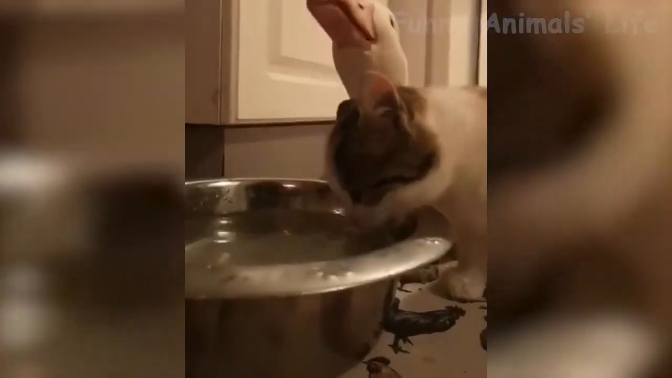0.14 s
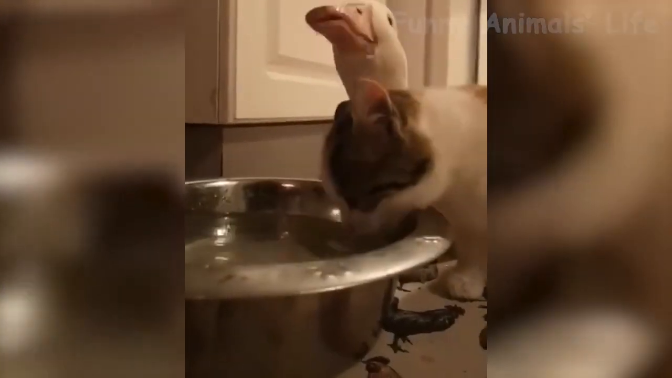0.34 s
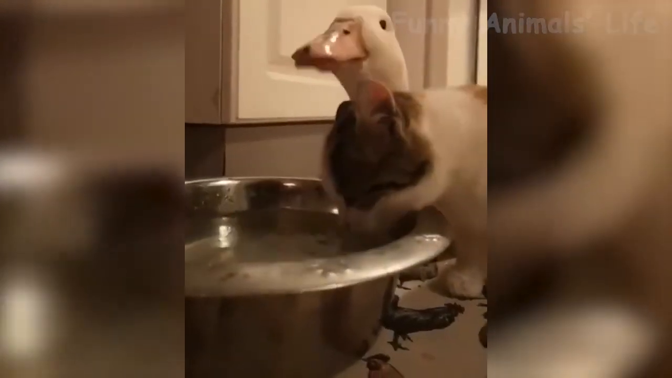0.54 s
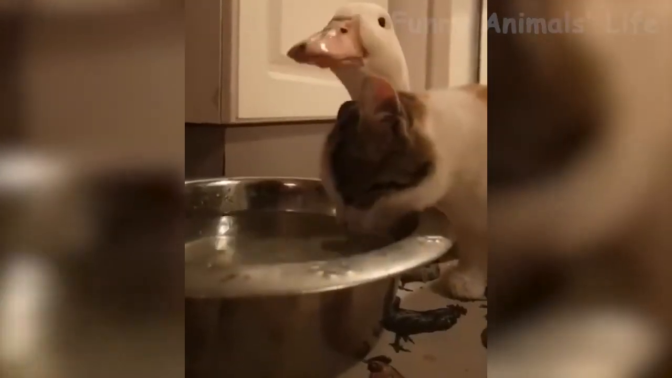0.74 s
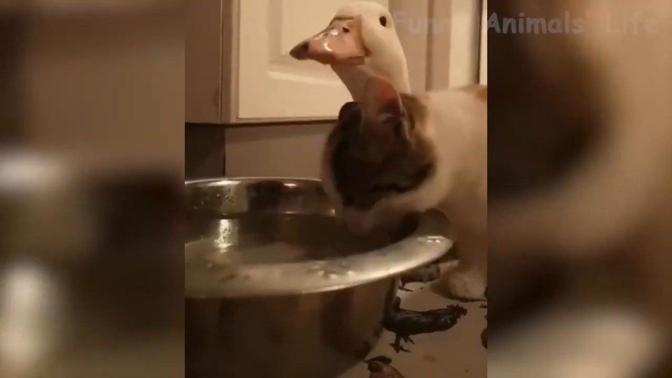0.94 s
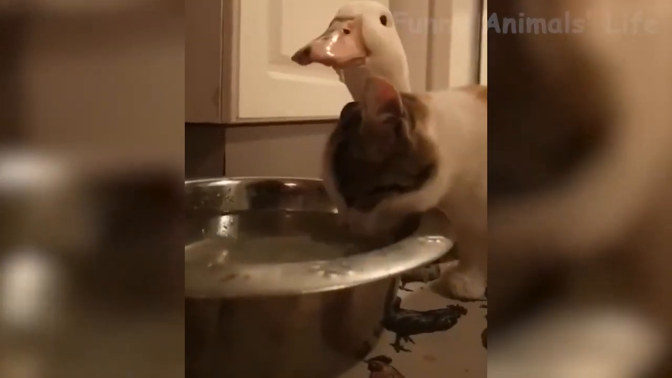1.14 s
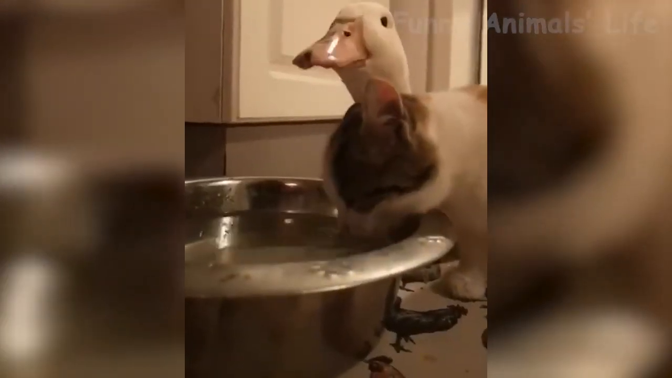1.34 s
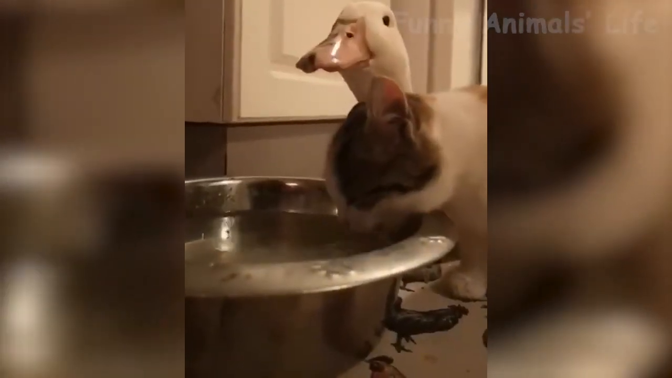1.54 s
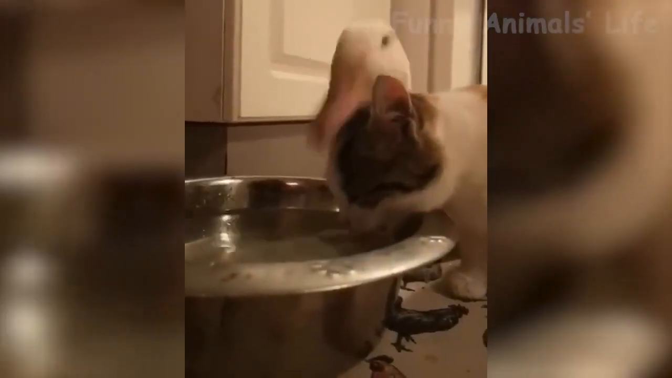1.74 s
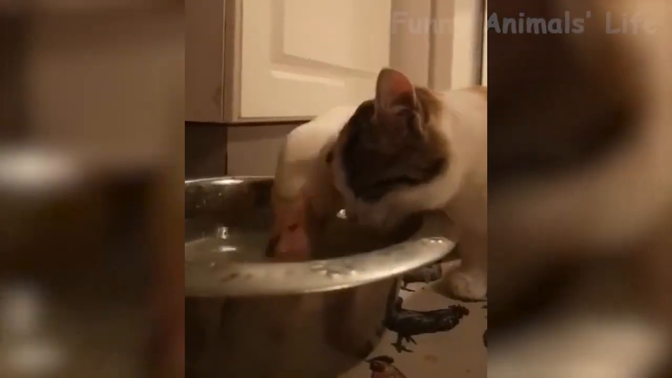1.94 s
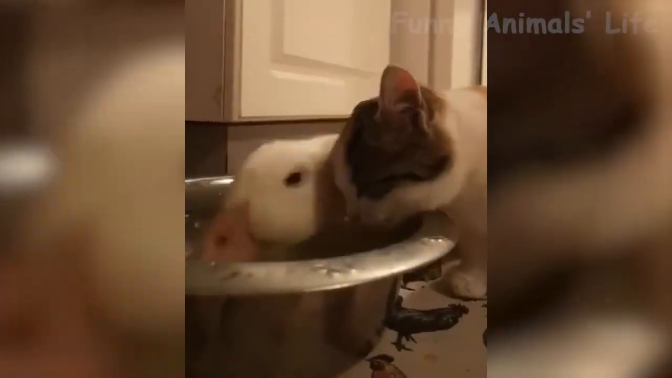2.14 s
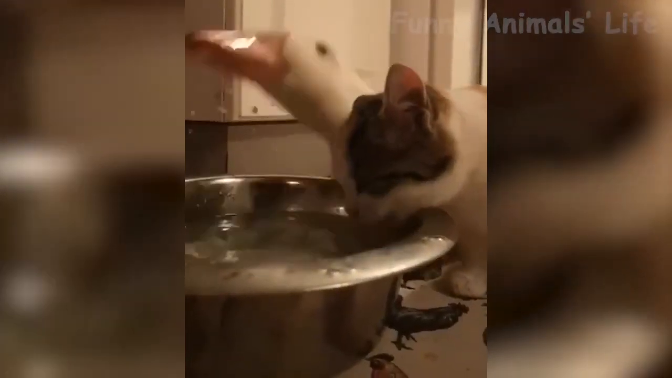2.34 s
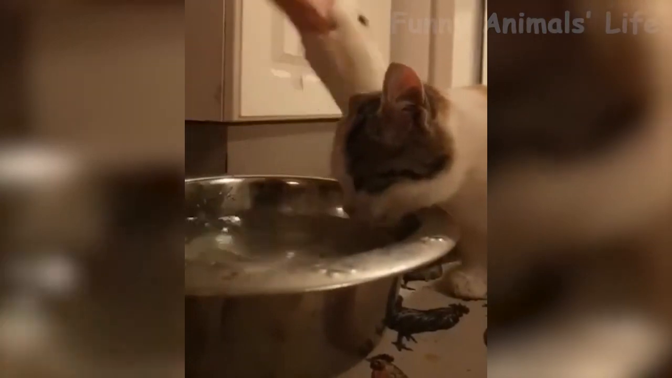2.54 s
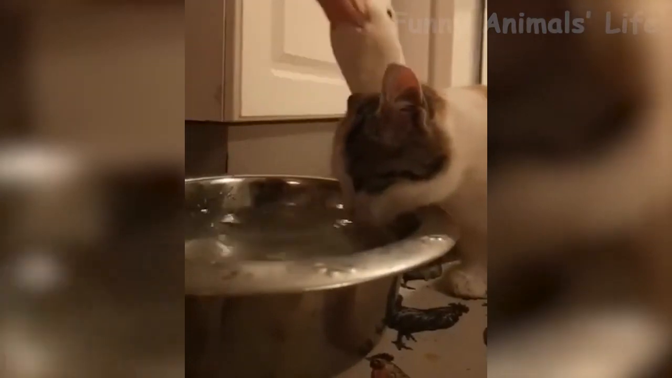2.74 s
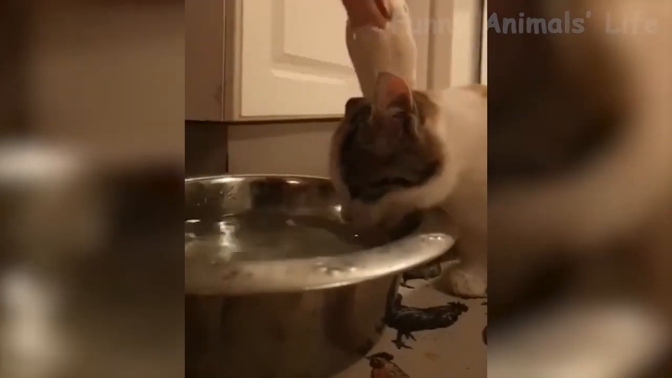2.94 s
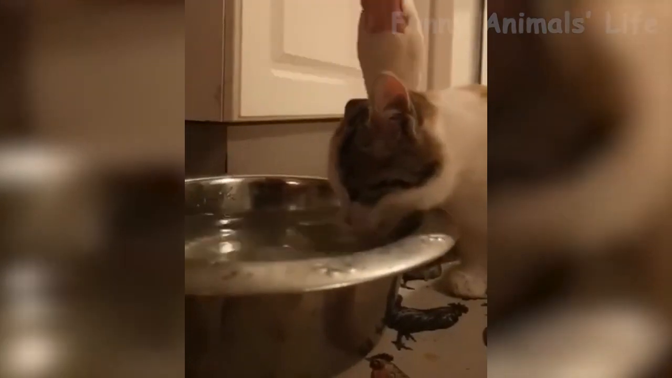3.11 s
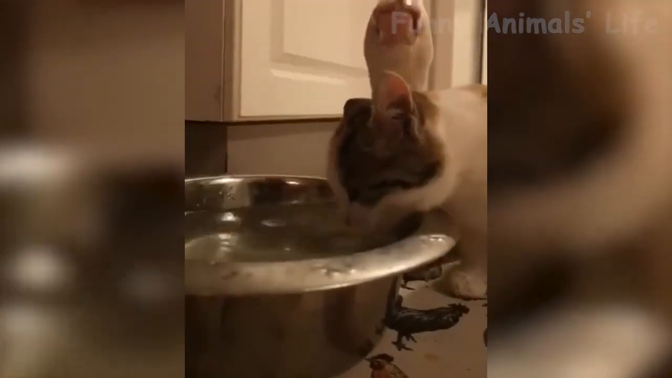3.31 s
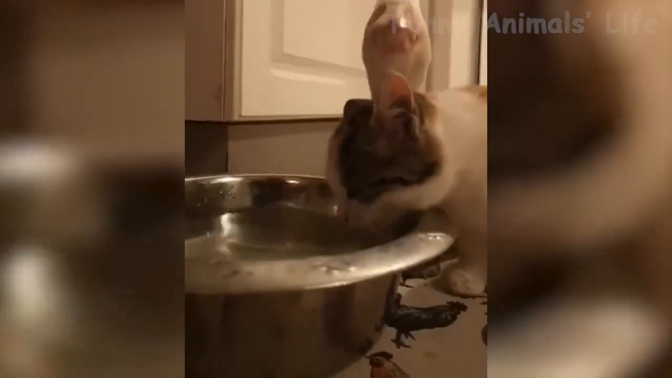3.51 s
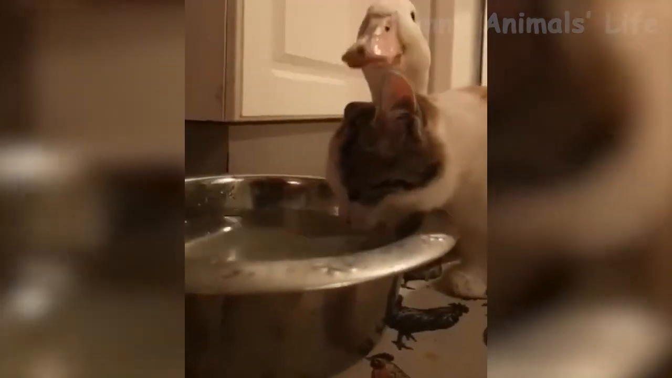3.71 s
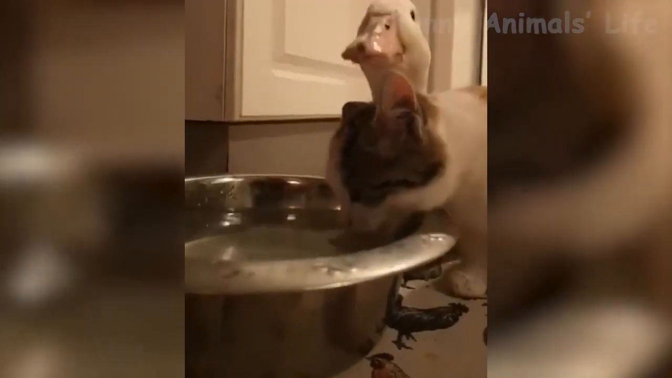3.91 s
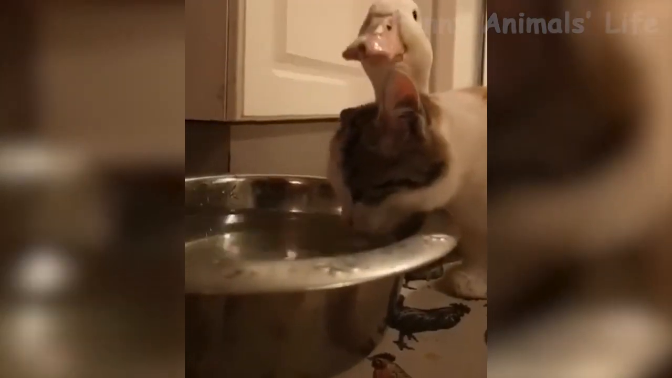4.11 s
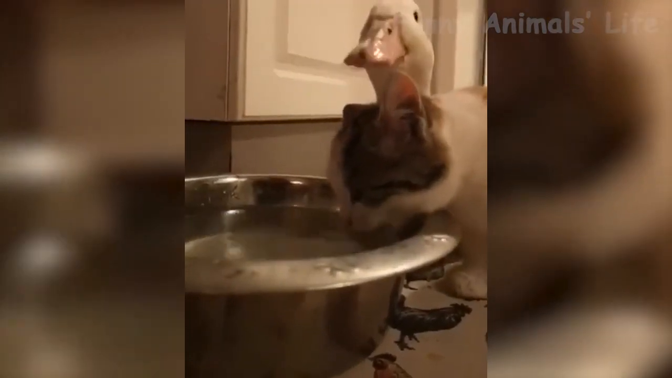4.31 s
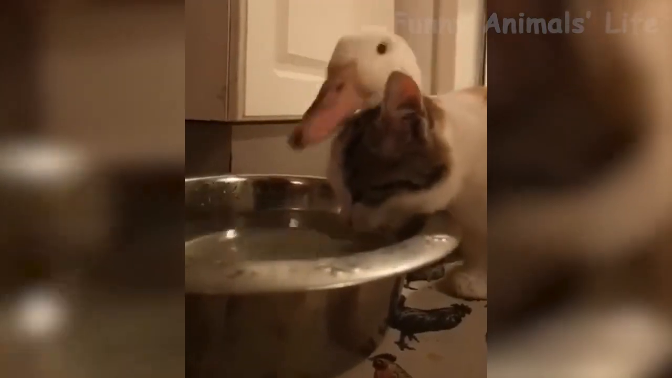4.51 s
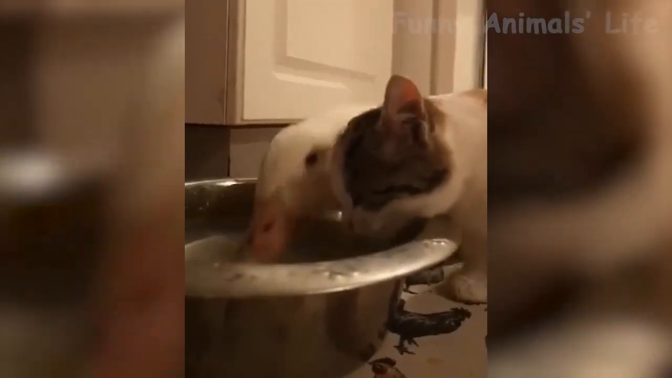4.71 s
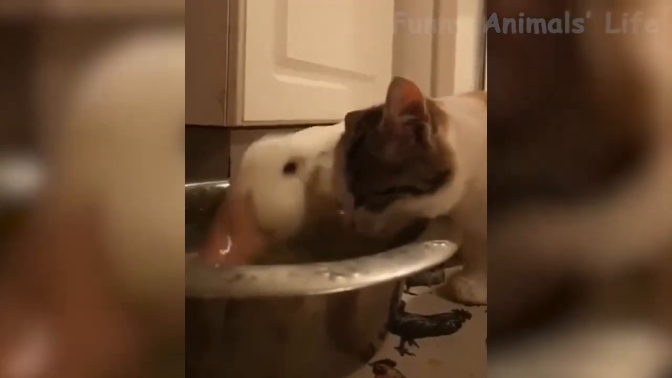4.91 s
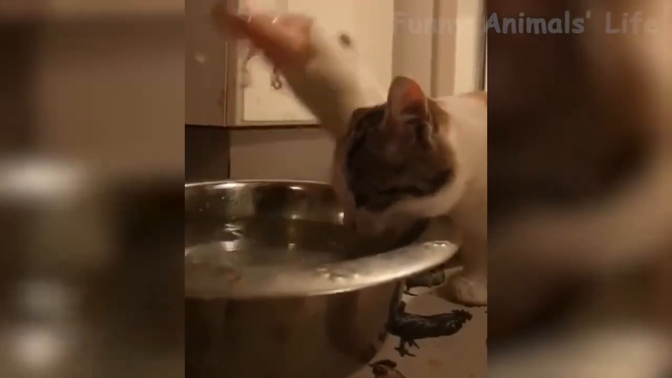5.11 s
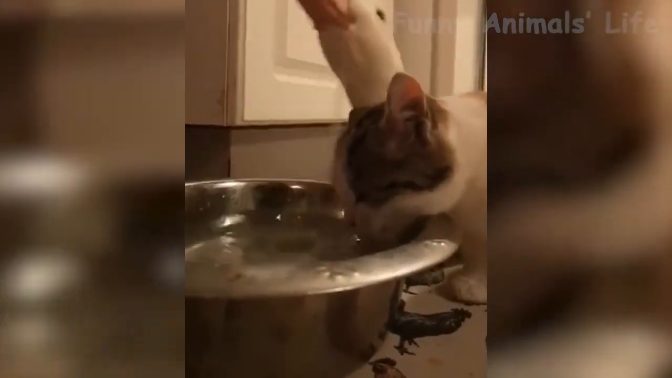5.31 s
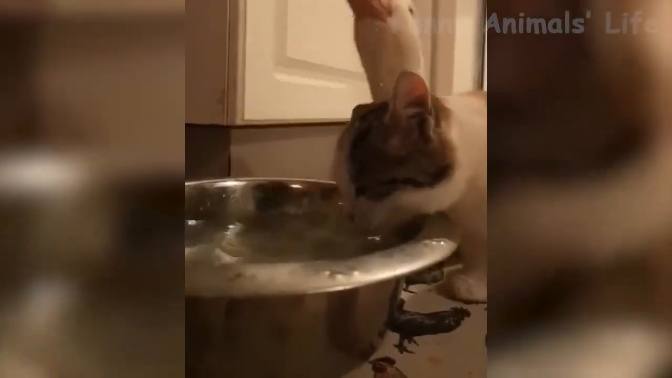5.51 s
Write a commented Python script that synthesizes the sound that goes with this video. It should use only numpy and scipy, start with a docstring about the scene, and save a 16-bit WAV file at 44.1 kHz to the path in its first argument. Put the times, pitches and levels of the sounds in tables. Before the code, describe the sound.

A faint, low motor hum fills a quiet room throughout, and the microphone sits close to a large metal bowl of water. For the first 1.5 seconds a cat laps softly, about five wet, hissing strokes a second, with tiny smacks and stray bubbles. A brief low bump comes near 1.2 seconds. From about 2 to 2.7 seconds a duck's bill splashes in: fizzing spray, sharp wet smacks, gurgling bubbles and a soft, dull knock near 2.4 seconds. The metal rings briefly and a low rumble swells. Quiet lapping continues from 2.8 to 4.3 seconds with occasional drips. At about 4.8 seconds the duck splashes again, and water runs back in bright plinks and gurgles, loudest around 5.2 to 5.3 seconds, over another low swell. A few last drops fall near 5.5 seconds.

```python
"""A cat laps from a large metal bowl while a duck twice dips its bill and lets the water run back.
Each tongue stroke is a soft hiss; the bill throws fizzing spray and knocks the bowl. Films of water
tear with wet smacks, trapped bubbles ring singly and in gurgling clusters, and the metal wall answers.
Behind it a motor hums in a quiet room, and the bass swells as the animals jostle the bowl.
A two-port microphone sits close."""
import sys
import numpy as np
from scipy import signal
from scipy.fft import rfft, irfft
from scipy.io import wavfile
from scipy.ndimage import uniform_filter1d

SR = 44100
rng = np.random.default_rng(int(sys.argv[2]) if len(sys.argv) > 2 else 0)


def digitize_waveform(pressure):
    """Quantize a signal to 16-bit integers and store it at the path in sys.argv[1].

    Rows of a 2-D input are taken as channels; values are limited to [-1, 1].
    """
    field = np.atleast_2d(pressure).T
    bounded = np.clip(field, -1, 1)
    quanta = np.round(bounded * 32767).astype(np.int16)
    wavfile.write(sys.argv[1], SR, quanta)


N = 244755

# EQ curves for room, rumble, spray and tongue hiss. Each row: frequency in Hz, relative level in dB.
# Room, spray and hiss share a sharp treble cut near 10 kHz, a band limit laid over their natural tone.
ROOM_EQ = [(90, -2), (150, -3.5), (300, -13), (760, -14.5), (1500, -12.5), (2600, -17), (3300, -26.5),
           (9000, -30.5), (9900, -63.5)]
RUMBLE_EQ = [(8, 4), (30, -1.5), (60, 0.5), (100, 0.5), (200, -16.5), (400, -18)]
SPRAY_EQ = [(300, -21.5), (1200, -4.5), (2100, -1.5), (3300, -4), (4800, -3.5), (7000, -6.5), (9200, -9),
            (9900, -21), (11000, -21.5)]
LAP_EQ = [(1300, -16), (2000, -2), (2900, -14), (5000, -7), (5900, 1), (6700, -7), (8900, -8), (9900, -28),
          (11000, -28)]
# Stereo width of the noise beds. Each row: frequency in Hz, left-right likeness from 0 to 1.
PORT_LIKENESS = [(100, 1.), (280, 0.99), (600, 0.057), (3000, 0.26), (9000, 0.03)]
# Phase between the ports. Each row: frequency in Hz, left lead in radians.
PORT_LEAD = [(260, 0.022), (780, 0.96), (2900, 2.29), (5300, 8.9), (8300, 4.3), (11000, 6.9)]
# Port balance. Each row: frequency in Hz, left over right in dB.
PORT_BALANCE = [(1200, -.5), (2200, 2.5), (7400, 1.5)]
# The motor's orders. Each row: pitch in Hz, resting level in dB.
MOTOR_ORDERS = [(30.5, -55.5), (90.5, -54.5), (120.5, -64)]
# The animals jostle the bowl. Each row: peak in seconds, bass lift in dB, rise and fall in seconds.
JOSTLES = [(1.19, 11, 0.053, 0.037), (2.548, 10, 0.38, 0.16), (5.35, 9.5, 0.68, 0.15)]
# Tail of bowl and room. Each row: frequency in Hz, time to fall 60 dB in seconds.
TAIL_DECAY = [(600, 0.23), (2500, 0.37), (6000, 0.039), (11000, 0.021)]
# Modes of the metal wall. Each row: pitch in Hz, relative level in dB.
WALL_MODES = [(1900, -6), (2780, -5), (2930, 0), (3110, -2)]
# The bill hits the bowl. Each row: start in seconds, level in dB.
BILL_KNOCKS = [(2.409, -30.5), (2.533, -53)]
# Water runs back in bubble clusters. Each row: start in seconds, level in dB, centre pitch in Hz.
RUNBACK = [(2.05, -45, 879), (2.128, -43, 2300), (2.381, -40.5, 1202), (2.531, -44, 767),
           (2.597, -36.5, 2660), (2.639, -43.5, 2000), (4.929, -34, 2132), (5.1, -35, 1450),
           (5.123, -36.5, 1934), (5.225, -42, 2880), (5.312, -26, 2787), (5.497, -42.5, 1740)]
# Water thrown by the bill. Each row: peak in seconds, level in dB, fall in seconds.
BILL_SPLASHES = [(2.098, -47.5, 0.085), (2.157, -39.5, 0.035), (2.229, -36.5, 0.051), (2.313, -39, 0.27),
                 (2.444, -35.5, 0.02), (2.485, -38, 0.079), (2.607, -34, 0.061), (4.81, -52.5, 0.64),
                 (4.95, -40, 0.1), (5.141, -31.5, 0.064), (5.23, -29, 0.073), (5.31, -31.5, 0.097),
                 (5.526, -41, 0.065)]
# Single bubbles. Each row: start in seconds, level in dB, starting pitch in Hz,
# glide as the share of pitch gained or lost over half the ring.
LONE_BUBBLES = [(0.003, -36.5, 2140, -0.038), (0.236, -38, 2040, -0.053), (0.765, -39, 2260, 0.15),
                (1.432, -38, 2295, -0.011), (2.048, -30.5, 970, -0.022), (2.095, -32.5, 948, 0.47),
                (2.2262, -17, 1680, 0.81), (2.231, -33, 2650, 0.32), (2.38, -22.5, 1270, 0.12),
                (2.397, -23.5, 1320, -0.44), (2.411, -35.5, 627, 0.71), (2.434, -20.5, 2153, 0.042),
                (2.505, -22.5, 1828, 0.022), (2.514, -19, 1832, -0.019), (2.554, -28.5, 2315, 0.33),
                (2.594, -15.5, 2184, 0.26), (2.607, -20.5, 2950, -0.13), (2.65, -22.5, 1840, .05),
                (2.777, -28, 1940, .1), (2.926, -31, 2135, 0.098), (3.536, -31.5, 1980, -0.092),
                (4.278, -32, 993, -0.048), (4.281, -37, 2020, 0.32), (4.928, -20.5, 2196, -0.027),
                (4.956, -26.5, 2580, -0.16), (5.023, -26, 2830, -0.26), (5.065, -21, 5030, .02),
                (5.101, -20, 1057, 0.35), (5.117, -26.5, 775, 0.41), (5.127, -13.5, 1906, 0.16),
                (5.224, -9.5, 3080, -0.059), (5.309, -11.5, 3120, -0.34), (5.316, -27, 3030, 0.02),
                (5.328, -31, 2950, -0.031), (5.51, -30, 1740, -0.039)]
# Smacks of tongue, bill and falling drops. Each row: start in seconds, level in dB, centre in Hz.
WET_SMACKS = [(0.0937, -35.5, 10000), (0.2572, -28.5, 5660), (0.4725, -29.5, 5370), (0.639, -36.5, 6900),
              (0.6927, -39, 5940), (0.903, -30.5, 7800), (1.156, -43, 5560), (2.0576, -31, 3820),
              (2.1536, -26, 3900), (2.1987, -30.5, 3660), (2.226, -7, 3860), (2.3048, -12, 3980),
              (2.433, -29, 5450), (2.446, -20, 5050), (2.5712, -28.5, 9300), (2.593, -17, 2960),
              (2.606, -29, 9900), (2.6475, -31.5, 2720), (3.0662, -35, 9540), (3.5348, -24, 5330),
              (3.7587, -35, 8660), (4.067, -30.5, 7300), (4.797, -32.5, 8300), (4.848, -25.5, 7650),
              (4.8762, -22.5, 7840), (4.947, -16.5, 4940), (5.033, -35, 8000), (5.099, -23.5, 2700),
              (5.223, -11.5, 2600), (5.3082, -13.5, 2360), (5.5413, -17.5, 5660)]
# Strokes of the cat's tongue. Each row: peak in seconds, level in dB.
TONGUE_STROKES = [(0.11, -50), (0.291, -53), (0.495, -47.5), (0.662, -49), (.91, -57.5), (1.091, -46.5),
                  (1.219, -46), (1.289, -52.5), (1.519, -44), (2.77, -53), (2.901, -52.5), (3.049, -50),
                  (3.22, -51.5), (3.377, -48), (3.59, -45), (3.792, -49), (4.04, -49.5), (4.252, -46.5)]

ROOM_DB, RUMBLE_DB, TAIL_DB = -55, -53.5, -11
HUM_SWELL = 0.21  # share of the bass lift that the hum follows
WALL_T60_S, WALL_DB = 0.1, -14
TRICKLE_DB, TRICKLE_WANDER_DB = -64, 2.5
BUBBLE_RISE_S, BUBBLE_ROUGHNESS = 0.0017, 0.46
CLUSTER_S, CLUSTER_CYCLES = 0.054, 33  # a cluster lasts this long plus so many cycles of its pitch
CLUSTER_SINK = 0.166  # later bubbles are larger: share by which the pitch falls
CRACK_S, CRACK_LEAD_IN = 0.0075, 64  # a 3 kHz crack is 30 dB down by then; pre-roll in samples
CRACK_TOP_HZ, CRACK_DULLER_HZ_PER_DB = 14820, 161.5  # treble edge at 0 dB; softer cracks are duller
KNOCK_S, SPLASH_RISE_S, LAP_RISE_S, LAP_FALL_S = 0.0008, 0.015, 0.043, 0.049
TIME, CONTROL_TIME = np.arange(N) / SR, np.arange(0, N, 64) / SR


def amp(db):
    """Decibels to gain."""
    return 10 ** (np.asarray(db) / 20)


def unit_rms(x):
    """Scales to rms 1."""
    return x / np.sqrt(np.mean(x ** 2) + 1e-20)


def curve(points, hz):
    """Reads a spectrum table on a log-frequency axis."""
    f, value = np.transpose(points)
    return np.interp(np.log(hz + 1), np.log(f + 1), value)


def add(mix, s, sound):
    """Drops a stereo sound into the mix at s seconds."""
    part = mix[:, round(s * SR):][:, :sound.shape[1]]
    part += sound[:, :part.shape[1]]


def from_peak(t, peak_s, rise_s, fall_s):
    """Distance from a peak, in rise times before it and fall times after it."""
    return np.where(t < peak_s, (peak_s - t) / rise_s, (t - peak_s) / fall_s)


def swell_power(peak_s, db, rise_s, fall_s):
    """Power envelope, 10 dB down one rise before its peak and one fall after."""
    return amp(db - 10 * from_peak(CONTROL_TIME, peak_s, rise_s, fall_s) ** 1.6) ** 2


def noise(eq, size, patchy_db, flicker_db):
    """Stereo noise of rms 1 with drifting patches and a flicker shared by all bands."""
    hop = size // 4
    frames, hz = N // hop + 5, np.fft.rfftfreq(size, 1 / SR)
    a, b, c, d, patches = rng.standard_normal((frames, len(hz), 5)).T
    patches = uniform_filter1d(patches, size=size // 128, axis=0)
    patches = unit_rms(uniform_filter1d(patches, size=2048 // hop, axis=1))
    flicker = unit_rms(uniform_filter1d(rng.standard_normal(frames), size=512 // hop + 1))
    likeness = np.clip(curve(PORT_LIKENESS, hz), 0, 1)[:, None]
    left = a + 1j * b
    right = likeness * left + np.sqrt(1 - likeness ** 2) * (c + 1j * d)
    right *= np.exp(-1j * curve(PORT_LEAD, hz))[:, None]
    lean = amp(curve(PORT_BALANCE, hz) / 2)[:, None]
    eq_db = curve([(1, -90), *eq, (SR / 2, -120)], hz)[:, None]
    bands = np.array([left * lean, right / lean]) * amp(eq_db + patchy_db * patches + flicker_db * flicker)
    return unit_rms(signal.istft(bands, nperseg=size, noverlap=size - hop)[1][:, :N])


def room_tone():
    """A steady bed of quiet air."""
    return amp(ROOM_DB) * noise(ROOM_EQ, size=1024, patchy_db=1.5, flicker_db=.5)


def jostle_db():
    """The bass lifts each time the bowl is jostled."""
    return sum(db * np.exp(-from_peak(TIME, s, rise, fall) ** 3) for s, db, rise, fall in JOSTLES)


def motor_hum():
    """Each motor order wavers in strength and phase, riding up a little with the jostles."""
    slow, hum = TIME[::256], np.zeros(N)
    for hz, db in MOTOR_ORDERS:
        rates_hz = rng.uniform(-5.5, 5, 6)
        waver = sum(np.exp(2j * np.pi * (f * slow + rng.random())) for f in rates_hz) / np.sqrt(6)
        tone = np.exp(2j * np.pi * hz * TIME) * (1 + 0.68 * np.interp(TIME, slow, waver))
        hum += amp(db) * np.sqrt(2) * tone.real
    return amp(HUM_SWELL * jostle_db()) * hum


def rumble():
    """Low noise that swells with each jostle."""
    return amp(RUMBLE_DB + jostle_db()) * noise(RUMBLE_EQ, size=4096, patchy_db=0, flicker_db=2.5)


def bowl_tail(x):
    """Sparse reflections off bowl and room, different at each port, each band dying at its own speed."""
    taps, slots = np.zeros((2, SR // 2)), np.arange(120, SR // 2 - 20, 20)
    arrivals = slots + rng.integers(0, 20, (2, len(slots)))
    np.put_along_axis(taps, arrivals, rng.choice([-1., 1.], arrivals.shape), 1)
    hz, t, bands = signal.stft(taps, SR, nperseg=256)
    tail = signal.istft(bands * amp(-60 * t / curve(TAIL_DECAY, hz)[:, None]), SR, nperseg=256)[1]
    tail /= np.linalg.norm(tail[0])
    return amp(TAIL_DB) * signal.fftconvolve(x.mean(0)[None], tail, axes=1)[:, :N]


def wall_ring(x):
    """The metal wall picks up what lands near its modes and rings briefly, damped by the water."""
    t = np.arange(SR // 8) / SR
    modes = sum(amp(db - 60 * t / WALL_T60_S) * np.sin(2 * np.pi * hz * t) for hz, db in WALL_MODES)
    return amp(WALL_DB) * signal.oaconvolve(x, modes[None] / np.linalg.norm(modes), axes=1)[:, :N]


def trickle_power():
    """Power envelope of the unsettled surface, which fizzes faintly throughout."""
    wander = unit_rms(uniform_filter1d(rng.standard_normal(len(CONTROL_TIME)), size=60))
    return amp(TRICKLE_DB + TRICKLE_WANDER_DB * wander) ** 2


def bill_knock(db):
    """Bill against bowl: one dull push and its rebound."""
    age = np.arange(2048) / SR / KNOCK_S
    return amp([[db], [db]]) * 4 * age * (1 - age / 2) * np.exp(-age)


def bubble(hz, t60, glide, chance):
    """An air pocket rings unevenly, gliding as it rises or opens; two neighbours beat against it."""
    upper, lower, pan = chance
    t = np.arange(round(min(t60, .15) * SR)) / SR
    phase = 2 * np.pi * hz * (t + glide * t ** 2 / t60)
    ring = np.sin(phase) + .45 * np.sin(phase * (1.05 + .12 * upper))
    ring += .35 * np.sin(phase * (.94 - .14 * lower))
    ring *= 1 + BUBBLE_ROUGHNESS * np.sin(phase * (.05 + .1 * lower) + 2 * np.pi * upper)
    envelope = amp(-60 * t / t60) * (1 - np.exp(-t / BUBBLE_RISE_S))
    pan_db = 2 + 12 * (pan - .5)
    return amp([[pan_db / 2], [-pan_db / 2]]) * ring * envelope


def gurgle():
    """Water runs back in fading crowds of small bubbles, their pitches scattered about a centre."""
    out = np.zeros((2, N))
    for (s, db, hz), crowd in zip(RUNBACK, rng.random((len(RUNBACK), 30, 7))):
        for lateness, spread, softness, life, *chance in crowd:
            level_db = db - 12 * lateness - 3 * np.log(softness + 0.014)
            pitch = hz * np.exp(2.36 * (spread - .55) ** 3) * (1 + CLUSTER_SINK * (.3 - lateness))
            start = s + lateness * (CLUSTER_S + CLUSTER_CYCLES / hz)
            ring = bubble(pitch, t60=0.01 + 0.0428 * life, glide=0.2234, chance=chance)
            add(out, start, amp(level_db) * ring)
    return out


def bill_spray():
    """Fine fizz that swells and fades with each splash the duck throws."""
    power = sum(swell_power(s, db, SPLASH_RISE_S, fall) for s, db, fall in BILL_SPLASHES)
    fizz = noise(SPRAY_EQ, size=256, patchy_db=5, flicker_db=3.2)
    return np.interp(TIME, CONTROL_TIME, np.sqrt(power)) * fizz


def smack(db, hz):
    """A film of water tears: a crack of noise around the pitch of the gap, different at each port."""
    grit = rng.standard_normal((2, 2048))
    t, f = np.arange(2048) / SR, np.fft.rfftfreq(2048, 1 / SR) + 1
    length_s = CRACK_S * (3000 / hz) ** 0.4  # higher cracks are shorter
    top_hz = CRACK_TOP_HZ + CRACK_DULLER_HZ_PER_DB * db
    envelope = amp(-30 * (t / length_s) ** 2.3) * (1 - np.exp(-t / 0.00027))
    burst = np.roll((grit + 0.18 * grit[::-1]) * envelope, CRACK_LEAD_IN, axis=1)
    gap_ring = amp(3.5 - 10 * (np.log(f / hz) / 0.11) ** 2)
    db_per_octave = -5.5 + 0.083 * db  # softer cracks are narrower
    skirt = amp(db_per_octave * abs(np.log2(f / hz)) - 10 * (f / top_hz) ** 6)
    low_cut = 1 / (1 + (1000 / f) ** 4)
    crack = irfft(rfft(burst) * (skirt + gap_ring) * low_cut)
    return amp([[db + 0.69], [db - 1.0]]) * crack / abs(crack.mean(0)).max()


def cat_laps(trickle):
    """Each tongue stroke lifts a soft, wet hiss out of the surface trickle."""
    power = sum(swell_power(s, db, LAP_RISE_S, LAP_FALL_S) for s, db in TONGUE_STROKES)
    hiss = noise(LAP_EQ, size=256, patchy_db=4.5, flicker_db=3.5)
    return np.interp(TIME, CONTROL_TIME, np.sqrt(power + trickle)) * hiss


def scene():
    """Gurgles, smacks, bubbles and knocks sound the bowl; spray, laps and background are mixed in dry."""
    hits = gurgle()
    for s, db, hz in WET_SMACKS:
        add(hits, s - CRACK_LEAD_IN / SR, smack(db, hz))
    for s, db, hz, glide in LONE_BUBBLES:
        t60 = 0.021 + 14 / hz  # larger pockets ring longer
        add(hits, s, amp(db) * bubble(hz, t60, glide, rng.random(3)))
    for s, db in BILL_KNOCKS:
        add(hits, s, bill_knock(db))
    room = room_tone()
    resonance = bowl_tail(hits) + wall_ring(hits)
    trickle = trickle_power()
    return hits + resonance + bill_spray() + cat_laps(trickle) + rumble() + motor_hum() + room


def record(dry):
    """The microphone softens the top octave, then a steep low-pass closes the band."""
    soft = signal.lfilter(*signal.butter(4, 12200, fs=SR), dry)
    band_limit = signal.firwin(511, 14100, window=("kaiser", 9), fs=SR)
    return signal.oaconvolve(soft, band_limit[None], "same")


dry = scene()
out = record(dry)
digitize_waveform(out)
```